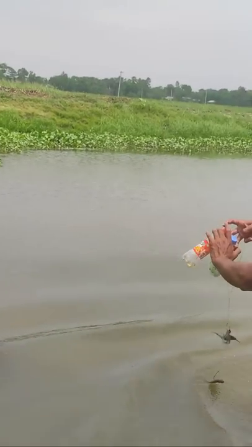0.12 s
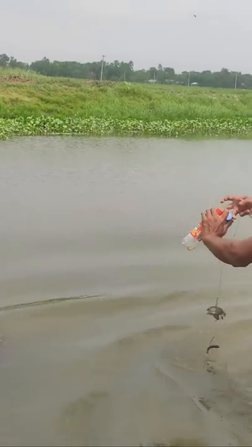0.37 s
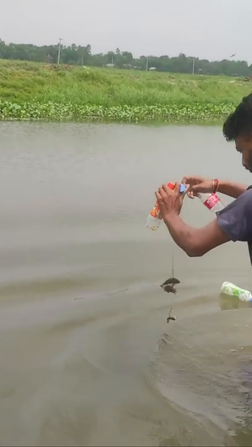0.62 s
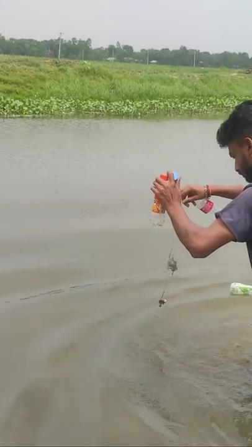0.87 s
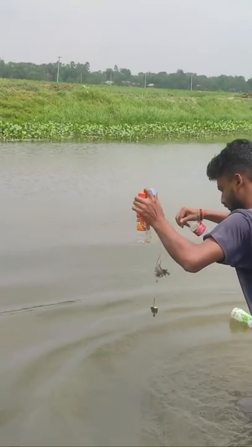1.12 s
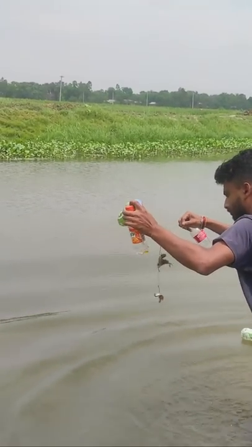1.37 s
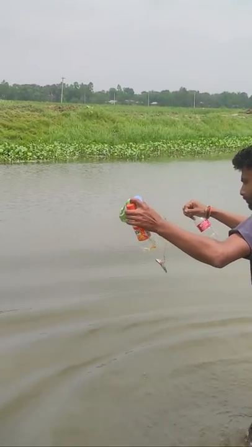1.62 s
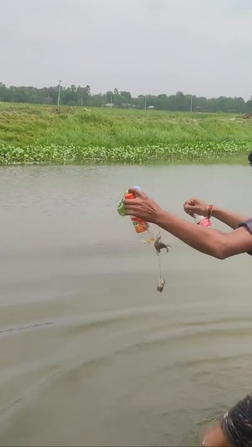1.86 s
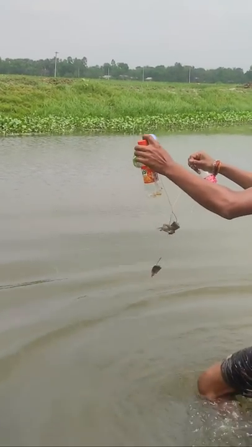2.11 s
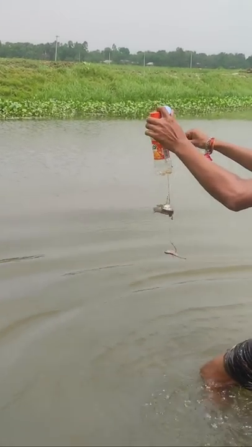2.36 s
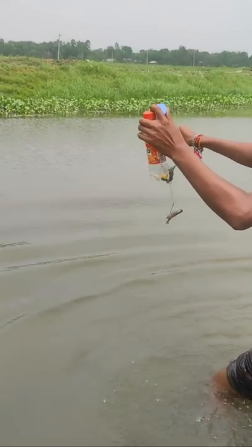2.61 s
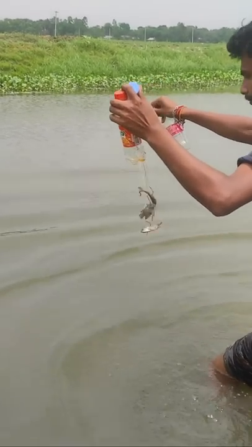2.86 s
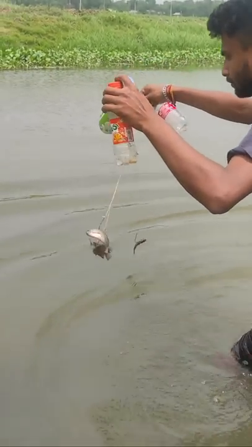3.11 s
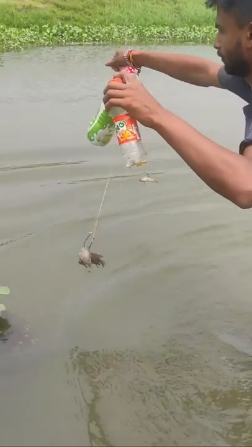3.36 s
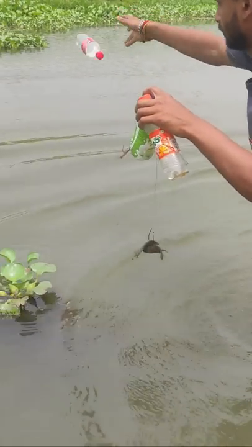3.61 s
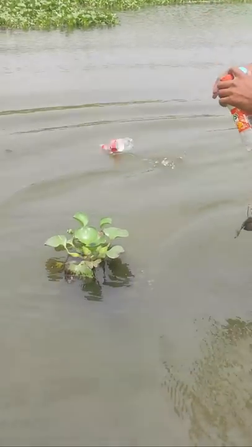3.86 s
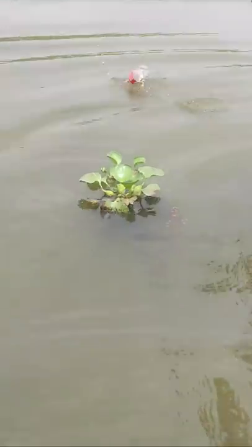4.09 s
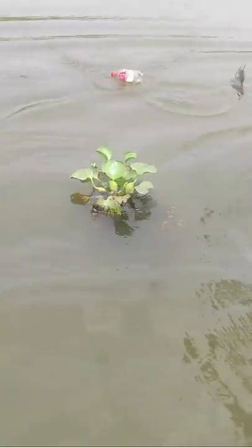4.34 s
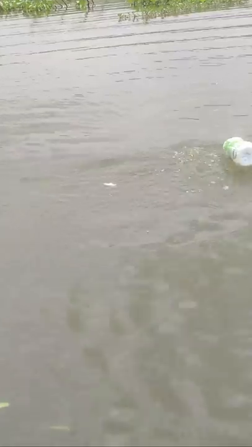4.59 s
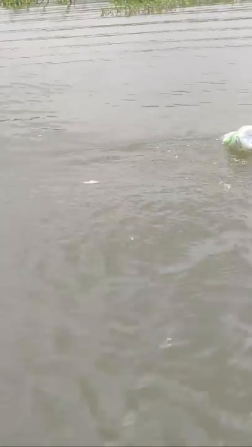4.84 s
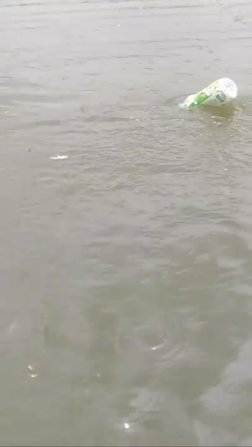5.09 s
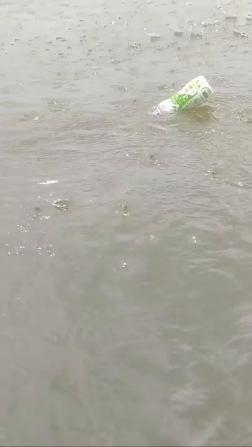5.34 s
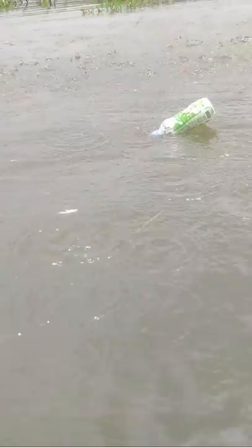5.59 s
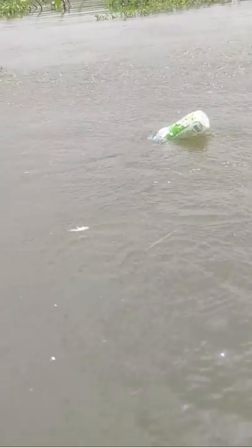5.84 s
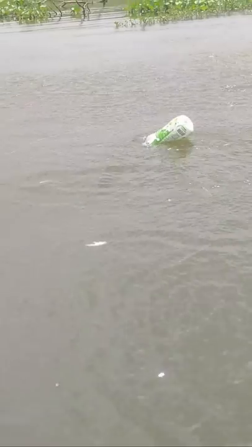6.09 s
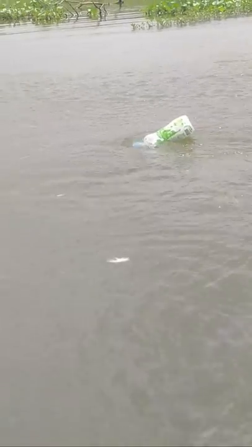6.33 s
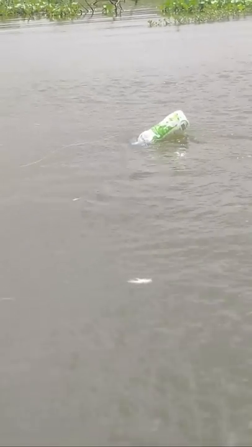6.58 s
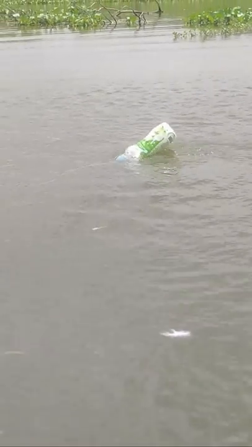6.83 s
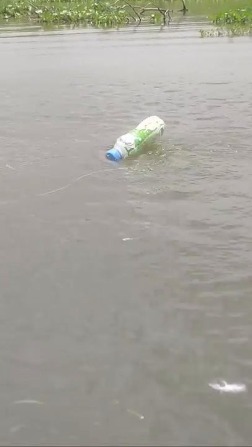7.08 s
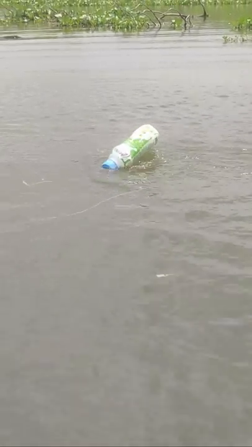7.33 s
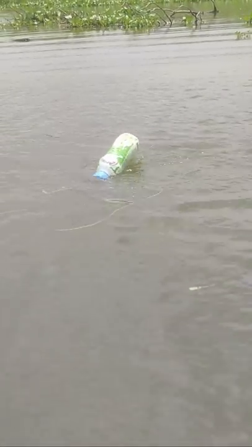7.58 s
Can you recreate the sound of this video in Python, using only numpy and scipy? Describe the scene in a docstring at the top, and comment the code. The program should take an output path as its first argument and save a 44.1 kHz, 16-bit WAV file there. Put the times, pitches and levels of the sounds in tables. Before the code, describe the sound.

Outdoors at a pond, close stereo phone microphones catch legs wading. At 0 s a brief watery surge fades into light bubbling while wind rumbles and thumps, mostly left, until about 0.4 s. From 0.9 to 1.6 s the water swells with drips, slaps and round, rising bubble plops, strongest near 1.2-1.4 s. It then thins to a trickle with sparse drips and faint gurgles climbing in pitch around 2.4-3.2 s. Small ticks tap the left side at 3.35 s; a gust leans right near 3.7 s. A tossed bottle plops at 3.9-4.1 s, with smaller splashes after. From 4.6 s low glugs and fuller slosh lead into hissing bright spray and sharp cracks around 4.9-5.5 s, leaning left. After a dip, crisp spatter bursts at 6.1 s, with rising bubbles, then settles. Wind grows from 6.4 s, with strong low thumps at 6.8 and 7.5 s and a few dull ticks.

```python
"""Legs wade through a pond beside a hand-held phone, from the start in surges of damped-sine bubbles and noise.
Wind, as low noise independent at the two microphone ports, rumbles from the start over quiet coloured air.
Air pockets (sines of rising pitch) and drips (short ringing sines) soon join; ragged low sines thump.
Within a second drops crack and slap as noise bursts; later, ticks sound mainly at the left port.
Floats are tossed in. The water's bearing shifts as the phone turns; spray and quiet air peak near 8 kHz."""
import sys
import numpy as np
from scipy import signal
from scipy.fft import rfft, irfft
from scipy.io import wavfile
from scipy.ndimage import map_coordinates

SR = 44100
rng = np.random.default_rng(int(sys.argv[2]) if len(sys.argv) > 2 else 0)


def transcribe(signal):
    """Save signal, clipped to [-1, 1], as a 16-bit WAV file at the path in sys.argv[1]."""
    frames = np.atleast_2d(signal).T
    limited = np.clip(frames, -1, 1)
    pcm = np.round(limited * 32767).astype(np.int16)
    wavfile.write(sys.argv[1], SR, pcm)


def ratio(d):
    """dB to gain"""
    e = np.asarray(d, float) / 20
    return 10 ** e


N = 339562  # length in samples


def unit(x):
    """Normalisation: scale to an rms of 1."""
    return x / np.sqrt(np.mean(x ** 2) + 1e-20)


def curves(rows):
    """Linear interpolation: one value per sample for each column after the time."""
    s, *cols = np.transpose(rows)
    return [np.interp(np.arange(N) / SR, s, c) for c in cols]


def wobble(rate):
    """Band-limited fluctuation: a smooth curve through random knots, rate of them a second."""
    knots = rng.standard_normal(int(N * rate / SR) + 4)
    return map_coordinates(knots, [np.arange(N) * rate / SR])


def coloured(x, points):
    """Minimum-phase filtering: a causal response of given magnitude, found by folding the cepstrum."""
    size = 8192
    f, db = np.transpose(points)
    log_hz = np.log(np.fft.rfftfreq(size, 1 / SR) + 1)
    log_gain = np.interp(log_hz, np.log(f), db) * np.log(10) / 20
    cepstrum = irfft(log_gain, size)
    cepstrum[1:size // 2] *= 2
    cepstrum[size // 2 + 1:] = 0
    impulse = irfft(np.exp(rfft(cepstrum)), size)
    return signal.fftconvolve(np.atleast_2d(x), impulse[None], axes=1)[:, :N]


def sides(pan_db):
    """Level difference: left and right gains, half the difference each."""
    return ratio(np.array([pan_db / 2, -pan_db / 2]))


def add(out, s, sound):
    """Superposition: mix a sound in at a time in seconds."""
    start = round(s * SR)
    out[:, start:start + sound.shape[-1]] += sound


# where the water sounds, as the phone turns: t/s, lead of left port/ms, spray L-R level/dB
WATER_BEARING = [(0, 0.052, -1), (3.2, -0.01, 0), (4.05, -0.1714, -1), (4.45, -0.0796, -1.5),
                 (4.62, 0.291, 9.5), (5.3, 0.2735, 9.5), (5.7, 0.212, 4), (5.9, -0.1513, 4),
                 (7.7, -0.2217, 4)]


def bearing():
    """Direction cues: the time lead of the left port in ms and the level difference of the spray in dB."""
    return curves(WATER_BEARING)


def pans():
    """Level differences: left-right dB of the low water (constant) and of the spray."""
    return np.full(N, 3.5), bearing()[1]


# colour of the right port against the left: f/Hz, level/dB
RIGHT_PORT_COLOUR = [(500, -0.5), (1300, 2), (3200, 0), (5200, 3.5), (6800, 1.5), (8800, -3.5),
                     (11000, 2.5)]


def placed(pair):
    """Arrival-time difference: sound from one side reaches the nearer port first; the right has its own colour."""
    half_lead = bearing()[0] * SR / 2000  # in samples, shared between the ports
    n = np.arange(N)
    left = map_coordinates(pair[0], [n + half_lead], order=3)
    right = map_coordinates(pair[1], [n - half_lead], order=3)
    return np.array([left, coloured(right, RIGHT_PORT_COLOUR)[0]])


def grains(count, hz, spread, cycles, rise, size_db, scatter_ms):
    """Bubble statistics: many damped sines of climbing pitch, a few much larger, each from its own spot."""
    draw = rng.random((count, 3))
    pitch_draw, spot = rng.standard_normal((2, count, 1))
    pitch = np.clip(hz * np.exp(spread * pitch_draw), hz / 2.5, SR / 4)
    n = np.arange(int(5 * cycles * SR / hz))
    u = n * pitch / SR / cycles
    envelope = u * np.exp(-3 * u) * (u < 2)
    body = np.sin(2 * np.pi * cycles * (u + rise * draw[:, 2:] ** 2 * u ** 2)) * envelope
    size = ratio(np.minimum(-size_db * np.log(draw[:, 1:2]), 16))  # exponential in dB
    half_lag = spot * scatter_ms * SR / 2000
    ports = []
    for way in (1, -1):
        start = np.abs(draw[:, :1] * N + way * half_lag).astype(int)
        ports.append(np.bincount((start + n).ravel(), (size * body).ravel(), N)[:N])
    return unit(np.array(ports))


def wash(grain, points, noise_db, apart_db):
    """Partial coherence: grains on noise common to both ports, plus noise separate at each."""
    common = ratio(noise_db) * rng.standard_normal(N)
    separate = ratio(apart_db) * rng.standard_normal((2, N))
    power = 1 + ratio(2 * noise_db) + ratio(2 * apart_db)
    return unit(coloured((grain + common + separate) / np.sqrt(power), points))


# surges of water, a stride or a tossed float each (levels before clumping):
# t/s, slosh level/dB, spray level/dB, time to swell 20 dB/s, time to die 20 dB/s
# a negative swell time: the level falls at the last column's rate up to t, then 20 dB in its magnitude
WATER_SURGES = [(0.02, -40, -43, 0.34, 0.1), (.1, -55, -50, -0.1, 0.83), (.6, -47.5, -77, 0.4138, 0.2234),
                (0.929, -48.5, -47, 0.09, 0.1163), (1.21, -35, -41.5, 0.3554, 0.4639),
                (1.5, -45, -64, 0.4559, 0.1929), (2.33, -53, -55.5, 1.03, 0.3847),
                (3.2, -55, -62.5, 1, 0.6), (3.971, -37, -40, 0.2833, 0.1485),
                (4.08, -36.5, -38.5, 0.0888, 0.131), (4.28, -44, -38, 0.1014, 0.1249),
                (4.44, -44, -49.5, 0.39, 0.3154), (4.8, -40, -45.5, 0.2324, 0.5219),
                (4.93, -44, -34, 0.2645, 0.6014), (5.14, -41.5, -31, .5, 0.454),
                (5.42, -45.5, -47, 0.68, 0.1), (5.98, -60.5, -50, 0.2259, 0.8036),
                (6.18, -46.5, -50, 0.005, 0.2775), (6.48, -49, -49.5, .5, 0.4136)]
# the trickle between surges: t/s, relative spray level/dB
WATER_TRICKLE = [(0, -58), (3.7, -61), (4.6, -51), (5.7, -62), (6.9, -61), (7.7, -66.5)]


def stirred():
    """Energy addition: powers of surges that swell and die sum over the trickle; returns three levels in dB."""
    t = np.arange(N) / SR
    trickle_db, = curves(WATER_TRICKLE)
    slosh = ratio(2 * (trickle_db - 1.5))  # the trickle's low froth lies under its spray
    spray = ratio(2 * trickle_db)
    for s, slosh_db, spray_db, swell, die in WATER_SURGES:
        fall_db = -20 * np.maximum((s - t) / swell, (t - s) / die)
        slosh = slosh + ratio(2 * (slosh_db + fall_db))
        spray = spray + ratio(2 * (spray_db + fall_db))
    slosh_db, spray_db = 10 * np.log10(slosh), 10 * np.log10(spray)
    # spatter mixes slosh and spray levels, and swings wider than that mix about a pivot
    slosh_share, growth, pivot_db = 0.451, 1.423, -41.5
    between_db = slosh_share * slosh_db + (1 - slosh_share) * spray_db
    # the spatter is fainter while the water leads at the left port: dB per ms of lead
    lead_cut_db = -19.5 * np.maximum(bearing()[0], 0)
    spatter_db = lead_cut_db + pivot_db + growth * (between_db - pivot_db)
    return slosh_db, spatter_db, spray_db


# colours of the low water, the spatter and the fine spray: f/Hz, level/dB
SLOSH_COLOUR = [(120, -37.5), (255, -2.5), (500, -1.5), (900, -0.5), (1450, -2), (2500, -33.5)]
SPATTER_COLOUR = [(500, -22.5), (1100, -4.5), (1700, -4.5), (3000, -2), (4500, -6.5), (7000, -31)]
SPRAY_COLOUR = [(1000, -60), (1900, -22), (2900, -12), (4500, -24), (6500, -9), (8100, 1.5), (9100, -5.5),
                (10400, -25.5), (13000, -31.5), (16000, -40.5)]


def wading():
    """Bubble resonance: froth below, smaller spatter and fine spray above, all in uneven clumps."""
    slosh_db, spatter_db, spray_db = stirred()
    slosh_pan_db, spray_pan_db = pans()
    clump_db = 1.082 * wobble(20) + 2.068 * wobble(50)
    froth = grains(count=3000, hz=800, spread=0.5508, cycles=4.65, rise=0.418, size_db=3.0, scatter_ms=0.1)
    gurgle = grains(count=350, hz=620, spread=.35, cycles=16, rise=.5, size_db=3, scatter_ms=.05)
    froth = froth + ratio(-6) * gurgle  # longer bubbles that climb far
    beads = grains(count=4000, hz=2200, spread=0.45, cycles=8.5, rise=0.175, size_db=4.0, scatter_ms=.11)
    fizz = grains(count=14000, hz=7006, spread=0.3982, cycles=3.2, rise=0.147, size_db=4.3, scatter_ms=.15)
    # in a hard splash the beads crowd into a rush; in a trickle they stand alone
    fused_db = 0.278 * (spatter_db + 54.5)
    slosh = wash(froth, SLOSH_COLOUR, noise_db=4.5, apart_db=-9)
    slosh = ratio(slosh_db + clump_db) * sides(slosh_pan_db) * slosh
    spatter = wash(beads, SPATTER_COLOUR, noise_db=-1.0 + fused_db, apart_db=-5.5)
    spatter = ratio(spatter_db + 2.5 + clump_db) * sides(slosh_pan_db) * spatter
    spray = wash(fizz, SPRAY_COLOUR, noise_db=-8.0, apart_db=-5)
    spray_clump_db = 0.94 * clump_db + 1.85 * wobble(120)
    spray = ratio(spray_db + 2.0 + spray_clump_db) * sides(spray_pan_db) * spray
    return slosh + spatter + spray


# wind on the ports: t/s, relative level/dB, L-R level/dB
WIND_GUSTS = [(0.0, -53.5, -0.5), (.2, -36, 10.5), (.48, -53.5, 9), (.79, -44, 5.5), (1.8, -49, 5),
              (2.05, -59.5, 3), (3.0, -59.5, 0.5), (3.74, -40, -9), (3.86, -52, -1.5), (4.15, -60.5, 7),
              (4.45, -57, 5), (4.68, -43, 0), (4.89, -49, 1), (5.25, -43, 0.5), (5.55, -53.5, 5.5),
              (6.1, -54.5, -4.5), (6.45, -41, -6), (6.85, -36.5, 0.5), (7.4, -39.5, -0.5), (7.69, -33, 4)]
# colours of the slow rumble and the faster flutter: f/Hz, level/dB
RUMBLE_COLOUR = [(10, -19.5), (20, 2), (60, -3), (100, -9), (200, -34), (400, -66)]
FLUTTER_COLOUR = [(40, -35), (90, -1.5), (180, 1), (300, -7.5), (450, -18), (800, -35), (1400, -74.5)]


def wind():
    """Incoherent turbulence: noise unrelated at the two ports, coming in lumps."""
    def lumps(db, rate):
        """Random modulation: independent slow gains at the two ports."""
        return ratio(db * np.array([wobble(rate), wobble(rate)]))

    gust_db, pan_db = curves(WIND_GUSTS)
    # flutter follows the gusts, and some stays in a lull
    flutter_db = 10 * np.log10(ratio(2 * (gust_db - 7.5)) + ratio(2 * -57.5))
    rumble = unit(lumps(2.54, 9) * coloured(rng.standard_normal((2, N)), RUMBLE_COLOUR))
    flutter = unit(lumps(4.5, 16) * coloured(rng.standard_normal((2, N)), FLUTTER_COLOUR))
    return sides(pan_db) * (ratio(gust_db + 4.0) * rumble + ratio(flutter_db) * flutter)


# colour of the quiet air: f/Hz, level/dB
STILL_AIR_COLOUR = [(100, -34), (300, -5), (1000, -7.5), (3500, -27), (8100, -9), (9600, -24), (11000, -22),
                    (13500, -18), (16000, -45.5)]


def still_air():
    """Stationary background: steady coloured noise, independent at the two ports."""
    return ratio(-64.5) * unit(coloured(rng.standard_normal((2, N)), STILL_AIR_COLOUR))


# air pockets: t/s, first f/Hz, last f/Hz, life/s, left level/dB (before swell, climb and waver)
AIR_POCKETS = [(.015, 800, 865, 0.029, -31), (.275, 758, 2520, 0.0421, -44), (.4, 760, 1250, .04, -43),
               (.552, 430, 700, .04, -39), (.585, 500, 900, .075, -40), (.655, 520, 1250, .065, -44),
               (.8, 480, 1050, .035, -43), (.89, 450, 760, .05, -39), (.905, 780, 1000, .035, -36),
               (1.29, 800, 1100, 0.0111, -23.5), (1.085, 976, 1214, 0.0184, -26.5),
               (1.2, 505.6, 550, 0.0797, -28.5), (1.219, 464.4, 734, 0.0115, -14),
               (1.334, 1577, 1930, 0.00753, -12.5), (1.436, 364, 581, .019, -26.5),
               (1.572, 330, 359, 0.0584, -35), (2.248, 1170, 1520, 0.0136, -34.5),
               (2.258, 419.2, 952, 0.0578, -42), (2.42, 410, 440, .07, -43),
               (2.6, 379.2, 1399, 0.1072, -42.5), (2.656, 290, 900, 0.092, -42),
               (2.751, 291.5, 953, 0.109, -47), (2.815, 297.4, 800, 0.0863, -43),
               (3.13, 310, 1400, .125, -45), (3.178, 500, 1300, .058, -41), (3.382, 850, 1500, .026, -40),
               (3.41, 800, 1300, .026, -44), (3.484, 1150, 1750, .018, -44),
               (3.524, 527, 736, 0.0324, -36.5), (3.625, 280, 420, .065, -42), (3.81, 430, 560, .04, -36),
               (3.971, 1518, 2370, 0.0071, -15.5), (4.072, 371.8, 398.5, 0.0496, -30),
               (4.265, 436.6, 483, 0.0945, -33), (4.44, 2200, 2900, 0.015, -32.5),
               (4.358, 483, 986, 0.0296, -24), (4.575, 958, 1180, 0.00696, -17.5),
               (4.718, 487, 534, 0.0128, -23), (4.732, 100.8, 249, 0.0826, -19.5),
               (4.785, 246.1, 612, 0.042, -21), (4.809, 330.7, 439, 0.0314, -19),
               (4.835, 709, 1190, 0.0307, -23), (4.895, 702, 846, 0.0447, -31.5),
               (4.975, 370, 620, .065, -30), (5.13, 448.6, 694, 0.0108, -12),
               (5.487, 765, 1092, 0.0251, -28.5), (5.917, 1426, 2000, 0.0132, -37.5),
               (6.2, 1511, 1910, 0.0166, -30), (6.115, 391.7, 850, 0.128, -39),
               (6.195, 440, 1248, 0.077, -36), (6.366, 1142, 1830, 0.0072, -26.5),
               (6.532, 741.3, 1490, 0.049, -38)]


def pockets():
    """Bubble resonance near a free surface: a pocket of air rings ever higher as it rises and opens."""
    out = np.zeros((2, N + SR))
    for s, first_hz, last_hz, life, db in AIR_POCKETS:
        u = np.arange(int(life * SR)) / (life * SR)
        attack = 1 - np.exp(-u * life / (.002 + 1.5 * life ** 2))
        swell = attack * np.exp(-1.3 * u) * (1 - u ** 6)
        # a long-lived pocket holds its pitch and climbs at the end
        climb = (last_hz / first_hz) ** u ** (1.3 + 7 * life)
        tone = np.sin(2 * np.pi * np.cumsum(first_hz * climb) / SR)
        # near the surface the pocket radiates better, so the climb stays loud
        add(out, s, ratio(db) * swell * climb ** 1.2 * tone)
    waver = ratio(3 * wobble(110))  # ripples overhead make the tone unsteady
    return out[:, :N] * ratio([[0], [-3.5]]) * waver


# single drips: t/s, relative level/dB, starting f/Hz
SINGLE_DRIPS = [(0.0588, -27.5, 3360), (0.1253, -33.5, 2000), (.26, -35, 1000), (.55, -33, 889),
                (.625, -39, 1104), (0.8989, -36, 2010), (1.048, -33, 958), (1.17, -28, 767),
                (1.275, -28, 692), (1.335, -20, 2232), (1.336, -26, 942), (1.405, -28.5, 678),
                (1.47, -35, 1050), (1.2162, -25, 3400), (1.8533, -43, 2095), (2.1654, -42, 2120),
                (2.205, -40, 701), (2.373, -40.5, 2390), (2.4272, -38, 1955), (2.598, -47, 2000),
                (2.9411, -43, 2830), (2.989, -40.5, 2820), (3.604, -36, 1026), (3.705, -38, 412),
                (3.895, -15, 1594), (3.895, -14, 2439), (4.059, -25, 1100), (4.1709, -36, 2060),
                (4.2947, -24.5, 2310), (4.5342, -38, 3070), (4.6194, -36.5, 1500), (6.0347, -36, 2840),
                (6.192, -38, 4300), (6.4464, -37.5, 2410), (6.45, -37, 861), (6.489, -37, 2900),
                (6.6983, -35.5, 1990), (6.7848, -40.5, 1790)]


def drips():
    """Entrained-bubble ringing: a drip traps a tiny bubble that rings a few cycles, climbing a little."""
    cycles, rise = 11, .06  # cycles to die 20 dB; over them the pitch climbs by twice the rise
    out = np.zeros((1, N + SR))
    for s, db, hz in SINGLE_DRIPS:
        cycle = np.arange(int(3 * cycles * SR / hz)) * hz / SR
        u = cycle / cycles
        envelope = ratio(db + 3.5 - 20 * u) * (1 - np.exp(-cycle / 0.7))
        add(out, s, envelope * np.sin(2 * np.pi * cycle * (1 + rise * u)))
    return sides(pans()[0]) * out[:, :N]


# low thumps at the ports, from wind or handling, each starting 5 ms before t:
# t/s, relative level at the louder port/dB, f/Hz, L-R level/dB (held within 30)
LOW_THUMPS = [(.164, -30, 92.6, 17.5), (.189, -32.5, 221.8, 27), (0.228, -30, 103.4, 19),
              (.269, -35, 67.6, 16), (.296, -34, 146.7, 15), (0.361, -37, 160, 15.5),
              (0.782, -31.5, 99.1, 5.5), (3.35, -34, 206.2, 26.5), (6.016, -39, 147.7, -17),
              (6.213, -38, 155.7, -20), (6.392, -33, 174.9, 1), (6.606, -30.5, 199.5, -6),
              (6.736, -37, 160.3, -21.5), (6.837, -18, 220.5, 13), (7.197, -29.5, 182.4, 11.5),
              (7.358, -27, 201.8, -23.5), (7.491, -18, 204.3, -31.5), (7.597, -22, 183.7, -13)]


def thumps():
    """Damped low oscillation: wind or handling gives a few ragged cycles, with a puff and slow push under them."""
    ring, puff = np.zeros((2, N + SR)), np.zeros((2, N + SR))
    t = np.arange(SR // 8) / SR
    swell = t / 0.00813 * np.exp(1 - t / 0.00943)
    push = 0.34 * np.sin(2 * np.pi * 35 * t)
    for s, db, hz, pan_db in LOW_THUMPS:
        near = sides(np.clip(pan_db, -30, 30))[:, None]
        near = ratio(db) * near / near.max()
        drift = 0.0103 * np.cumsum(rng.standard_normal((2, len(t))), axis=1)  # the phase wanders
        shake = 0.874 * np.sin(2 * np.pi * hz * t + drift)
        add(ring, s - .005, near * swell * (shake - push))
        add(puff, s - .005, near * swell * 8 * rng.standard_normal((2, len(t))))
    return ring[:, :N] + coloured(puff[:, :N], FLUTTER_COLOUR)


# drops and slaps: t/s, relative crack level/dB, body level relative to it/dB
WATER_DROPS = [(0.953, -35.5, -6), (1.0695, -33, -4), (1.102, -33.5, -8.5), (1.164, -24, -27.5),
               (1.1794, -31, -3), (1.3351, -37, 5), (1.5745, -30.5, -7.5), (2.1267, -29.5, -26.5),
               (2.3387, -31, -17.5), (3.752, -36, -2), (3.7713, -22, -11), (3.896, -34, 16),
               (3.9928, -16, -10.5), (4.091, -23, -8), (4.2568, -24.5, 0.5), (4.2968, -25.5, -3.5),
               (4.559, -27.5, -11), (4.7222, -20, -12), (4.9162, -11.5, -28.5), (4.9324, -20, -14),
               (4.951, -12.5, -40), (5.1635, -19, -35), (5.1726, -9.5, -30), (5.267, -15, -23),
               (5.3717, -18, -20), (5.46, -24.5, -25), (5.4844, -19, -26), (5.9115, -32, -30),
               (5.9908, -27, -15), (6.0646, -19, -17.5), (6.099, -23, -9.5), (6.114, -14.5, -12.5),
               (6.1252, -6.5, -25.5), (6.1447, -22, -34.5), (6.15, -16, -44), (6.2253, -34, -8),
               (6.288, -35, -9), (6.32, -34, -14), (6.377, -26, -7), (6.436, -26, -1.5), (6.483, -30, -30),
               (6.5004, -25, -16), (6.577, -37, -15), (6.767, -34, -35), (6.7845, -37, -20)]


def drops():
    """Impact radiation: each drop is a sharp crack with a short hiss, over a slap of lower body."""
    t = np.arange(SR // 10) / SR
    crack, body = np.zeros((1, N + SR)), np.zeros((1, N + SR))
    fade = ratio(-60 * t / 0.0072) + 0.51 * ratio(-60 * t / 0.019)
    for s, db, body_db in WATER_DROPS:
        burst = unit(coloured(fade * rng.standard_normal(len(t)), SPRAY_COLOUR))
        add(crack, s, ratio(db - 28.0) * burst)
        slap = ratio(-60 * t / 0.0326) * rng.standard_normal(len(t))
        add(body, s, ratio(db + body_db + 10.5) * slap)
    slosh_pan_db, spray_pan_db = pans()
    body = coloured(body[:, :N], SPATTER_COLOUR)
    return sides(spray_pan_db) * crack[:, :N] + sides(slosh_pan_db) * body


# ticks: t/s, relative dull level/dB, treble level relative to it/dB
PORT_TICKS = [(3.345, -42.5, 10.5), (3.352, -26, -3), (3.371, -41, 11), (6.851, -29, -42.5),
              (6.877, -29, -26), (6.902, -30.5, -23), (7.281, -36, -25)]


def ticks():
    """Transient excitation: short noise bursts, dull or sharp, 22 dB fainter at the right port."""
    dull, sharp = np.zeros((1, N + SR)), np.zeros((1, N + SR))
    t = np.arange(SR // 30) / SR
    for s, db, treble_db in PORT_TICKS:
        add(dull, s, ratio(db + 15 - 60 * t / 0.017) * rng.standard_normal(len(t)))
        add(sharp, s, ratio(db + treble_db + 11.0 - 60 * t / 0.0105) * rng.standard_normal(len(t)))
    # colours: f/Hz, level/dB
    low = coloured(dull[:, :N], [(100, -12.5), (400, 1.0), (900, 3.0), (1500, -13.0), (4000, -44.5)])
    high = coloured(sharp[:, :N], [(500, -26.5), (3000, -5.5), (8000, 5.0), (11000, -17.5), (16000, -15)])
    return (low + high) * ratio([[0], [-22]])


def scene():
    """Superposition: water from its bearing, wind, thumps and ticks at the ports, quiet air behind."""
    water = placed(wading() + pockets() + drips() + drops())
    return water + wind() + still_air() + thumps() + ticks()


def roll_off(x):
    """The treble ends steeply here."""
    return signal.sosfilt(signal.butter(12, 16670, fs=SR, output="sos"), x)


def record(dry):
    """Storage: the phone stores the sound of its two ports."""
    return roll_off(dry)


dry = scene()
out = record(dry)
transcribe(out)
```